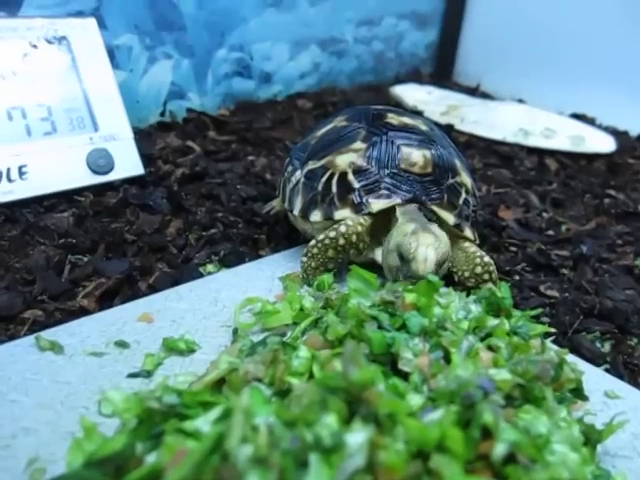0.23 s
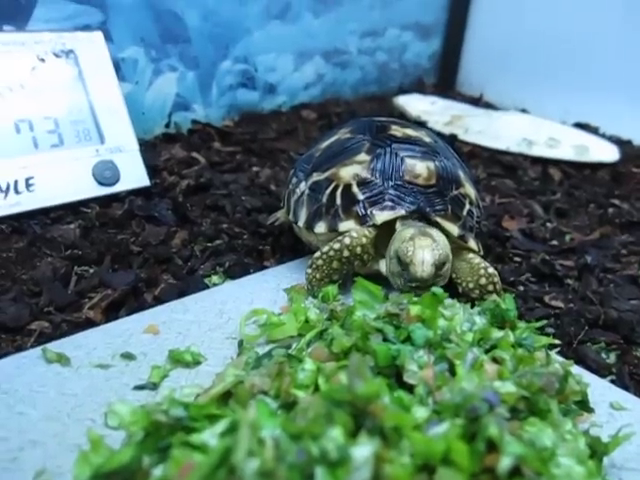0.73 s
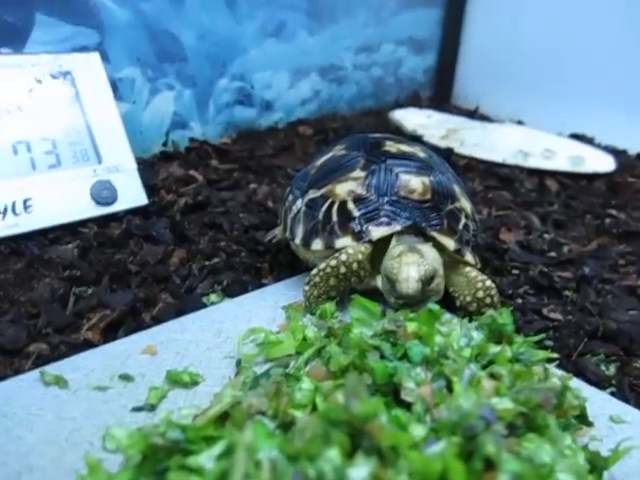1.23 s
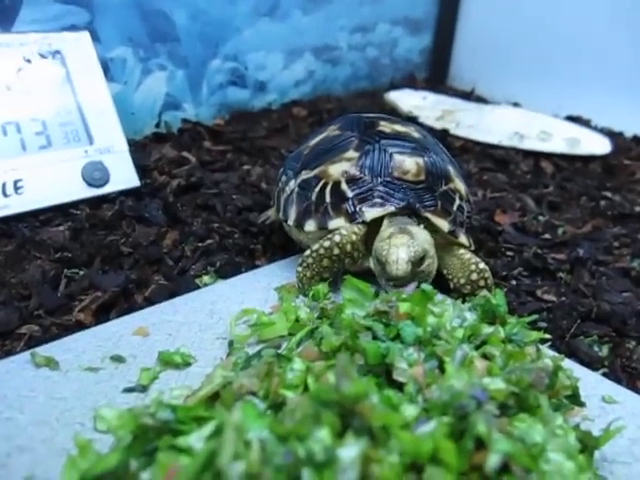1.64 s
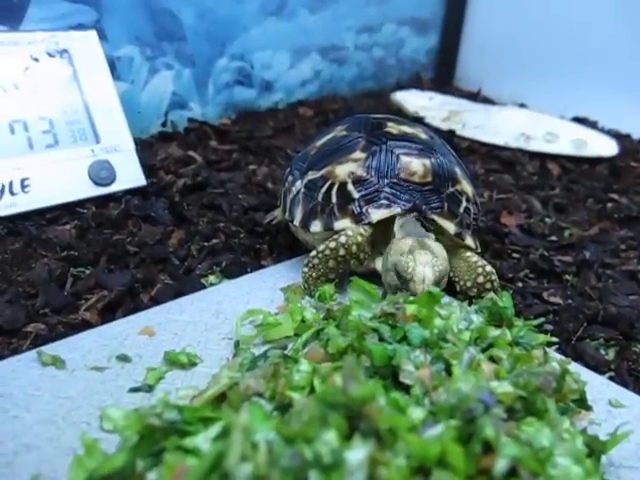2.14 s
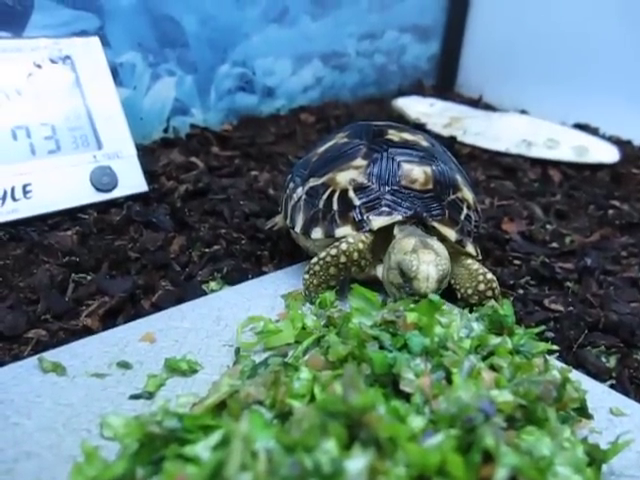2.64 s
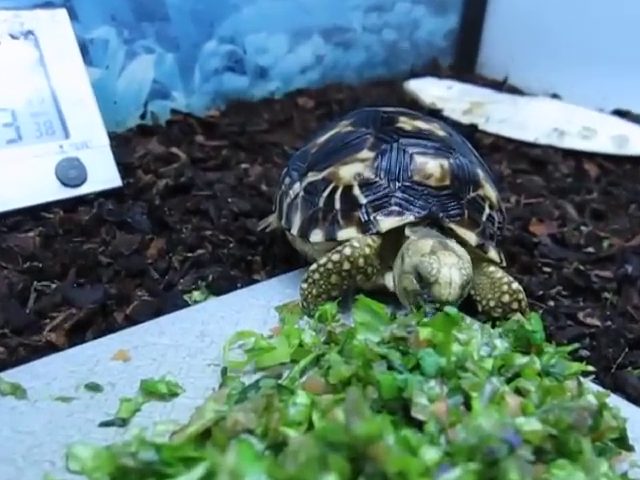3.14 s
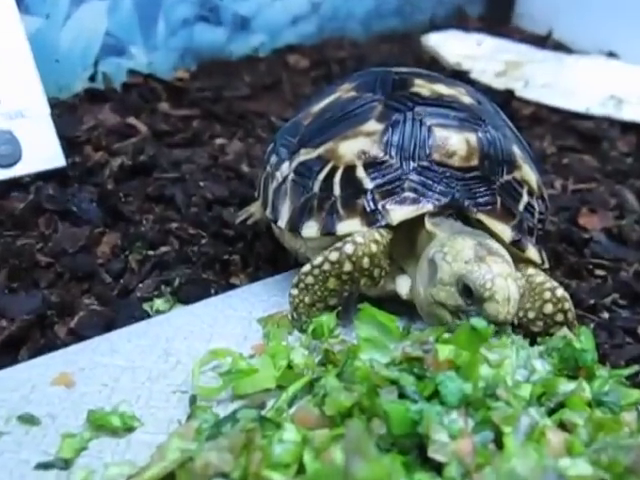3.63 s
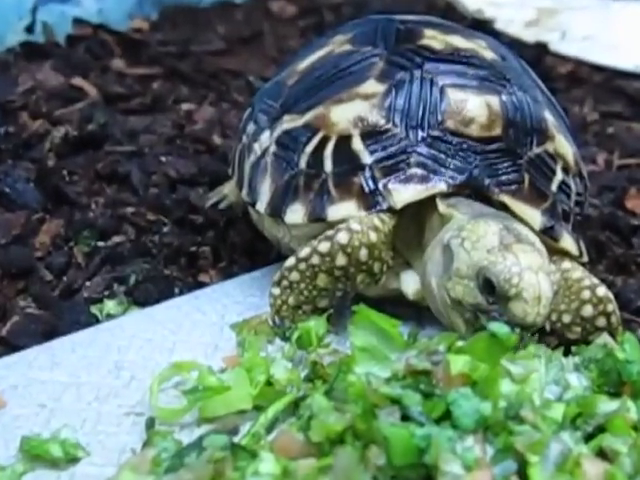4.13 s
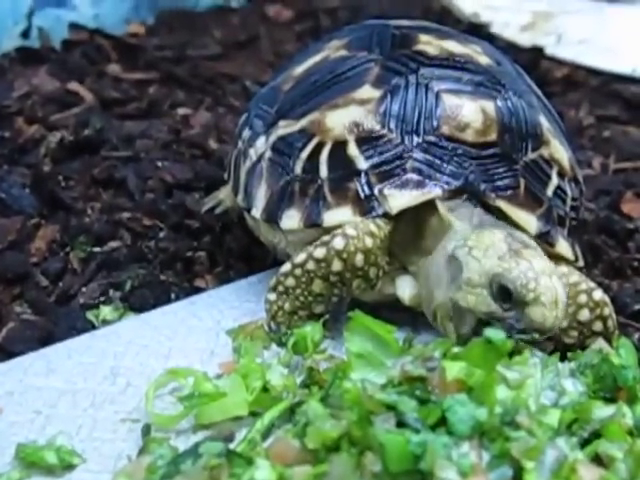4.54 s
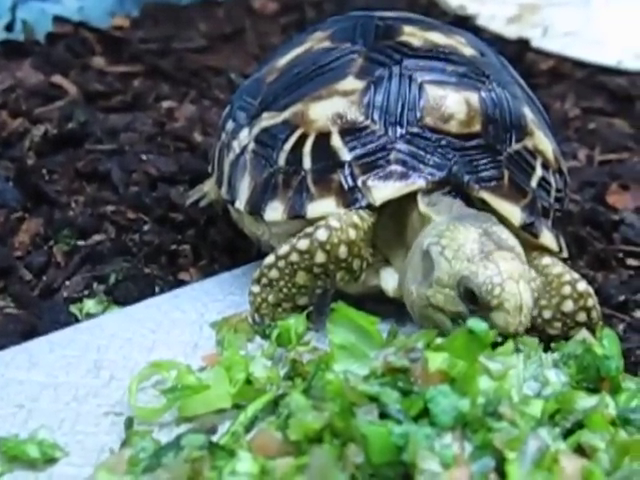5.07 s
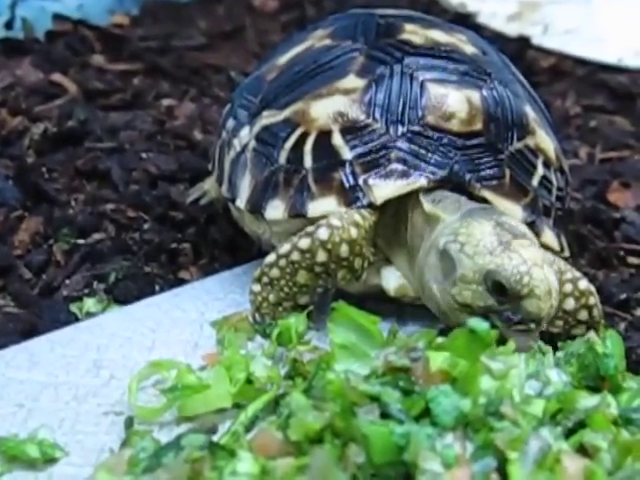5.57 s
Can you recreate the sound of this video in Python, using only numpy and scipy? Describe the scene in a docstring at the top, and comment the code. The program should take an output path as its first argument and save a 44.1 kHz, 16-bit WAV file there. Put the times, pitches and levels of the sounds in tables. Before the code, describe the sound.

Irregular small clicks, leafy rubs and a hard beak knock in a small glass tank, over quiet hiss, hum and a faint far engine.

```python
"""Room air, a low hum and a far engine's drone; then, close by, a tortoise eats greens off a slab in a glass tank.
The engine swells faintly, then harder, and falls back: a gliding firing note with two neighbours.
Snaps, small ticks, jaw knocks and pings of thin metal are impulses through damped modes.
Leaves slide as coloured friction noise in short strokes; room air and hum are filtered noise with sine whine.
The eating sounds scatter off the glass; both channels are the same."""
import sys
import numpy as np
from scipy import signal
from scipy.fft import rfft, irfft, next_fast_len
from scipy.io import wavfile
from scipy.ndimage import map_coordinates

SR = 44100
rng = np.random.default_rng(int(sys.argv[2]) if len(sys.argv) > 2 else 0)


def bounce(signal):
    """Save signal as a 16-bit WAV file at the path given by the first command-line argument."""
    frames = np.transpose(np.atleast_2d(signal))
    limited = np.clip(frames, -1, 1)
    pcm = np.round(limited * 32767).astype(np.int16)
    wavfile.write(sys.argv[1], SR, pcm)


N = 255861


def amp(db):
    """Amplitude ratio of a level in dB."""
    return 10 ** (np.asarray(db) / 20)


def unit(x):
    """Scale to rms 1."""
    return x / np.sqrt(np.mean(x ** 2) + 1e-20)


def along(points, hz):
    """Interpolate (frequency [Hz], value) points on a log frequency axis."""
    point_hz, values = np.transpose(points)
    return np.interp(np.log(hz + 1), np.log(point_hz), values)


def hump(x):
    """A bell of height 1, half as high at x = 1."""
    return 1 / (1 + x * x)


def wobble(knots_per_s):
    """A smooth random curve through normally distributed knots."""
    knots = rng.standard_normal(int(N * knots_per_s / SR) + 4)
    return map_coordinates(knots, [np.arange(N) * knots_per_s / SR])


def filtered(x, response):
    """x through a complex response, given as a function of frequency in Hz."""
    m = next_fast_len(N + SR // 2)
    spectrum = rfft(x, m) * response(np.fft.rfftfreq(m, 1 / SR))
    return irfft(spectrum, m)[:N]


def resonance(f, hz, width_hz):
    """One damped mode, gain 1 at its centre."""
    return 1j * f * width_hz / (hz * hz - f * f + 1j * f * width_hz)


def body(f, modes, order=1):
    """Sum of modes, neighbours in opposite phase; order 2 starts softer and has deeper valleys."""
    total = 0
    for k, (hz, width_hz, db) in enumerate(modes):
        # the root of the order offsets the narrowing caused by the power
        mode = resonance(f, hz, width_hz * np.sqrt(order)) ** order
        total = total + (-1) ** k * amp(db) * mode
    return total


def double(f, gap_ms, second_db):
    """Response of an impulse followed by a second one at its own level."""
    return 1 + amp(second_db) * np.exp(-2j * np.pi * f * gap_ms / 1000)


def fibres(t60_s):
    """Clinging fibres let go over a few milliseconds: response of a dying crackle of energy 1."""
    t = np.arange(SR // 2) / SR
    crackle = rng.standard_normal(len(t)) * amp(-60 * t / t60_s)
    return rfft(crackle / np.linalg.norm(crackle))


def blow_grid():
    """Frequencies of a half-second response."""
    return np.fft.rfftfreq(SR // 2, 1 / SR)


def add(track, time_s, response):
    """Add one impulse through a response to the track, in place."""
    sound = irfft(response)
    part = track[round(time_s * SR):][:len(sound)]
    part += sound[:len(part)]


# air spectrum shape: (frequency [Hz], relative level [dB])
AIR_SHAPE = [(12, -28), (20, -3.5), (90, -4.5), (116, -4.5), (167, -10), (197, -7.5), (355, -7), (419, -9),
             (603, -6), (2800, -14.5), (3040, -16), (6840, -19.5), (8790, -21.5), (14100, -26.5),
             (15800, -31)]
# noise bands: (centre [Hz], width before widening [Hz], level [dB rms])
DRONE_BANDS = [(60, 15, -72), (120.8, 8.8, -68), (169, 19.3, -63.5), (347.5, 20.6, -69.5), (8630, 650, -70)]
# faint electrical whine: (frequency [Hz], level [dB rms])
WHINE_TONES = [(5636, -86), (6535, -85), (7574, -86), (7854, -86), (7881, -84), (8446, -82), (13916, -89)]


def room(air_db_rms=-54.8, widening=1.86):
    """Steady shaped noise, droning narrow noise bands and thin electrical sine tones."""
    t = np.arange(N) / SR
    air_noise = filtered(rng.standard_normal(N), lambda f: amp(along(AIR_SHAPE, f)))
    out = amp(air_db_rms) * unit(air_noise)
    for hz, width_hz, db in DRONE_BANDS:
        band = filtered(rng.standard_normal(N), lambda f: resonance(f, hz, widening * width_hz) ** 2)
        out += amp(db) * unit(band)
    for hz, db in WHINE_TONES:
        out += amp(db) * unit(np.sin(2 * np.pi * hz * t))
    return out


# engine revs: (time of top [s], top firing note [Hz], level [dB],
#   time from top to quarter amplitude [s], rise time from half pitch to top [s])
ENGINE_REVS = [(0.323, 162.9, -60, 0.84, 4.6), (1.399, 162.3, -49, 0.42, 1.55)]
COAST_SLOWER = 1.2  # the pitch falls more slowly than it rose
CYLINDERS = 4


def motor(waver_db=0.5, waver_hz=0.28, below_db=-21, above_db=-17):
    """Each rev rises and falls in pitch and level: a wavering firing note with two weaker neighbours."""
    out, t = np.zeros(N), np.arange(N) / SR
    for top_s, top_hz, db, swell_s, pitch_s in ENGINE_REVS:
        glide_s = np.where(t < top_s, pitch_s, pitch_s * COAST_SLOWER)
        firing_hz = top_hz * hump((t - top_s) / glide_s) + waver_hz * wobble(11.7)
        cycle = 2 * np.pi * np.cumsum(firing_hz) / SR / CYLINDERS
        note = np.sin(CYLINDERS * cycle)
        note += amp(below_db) * np.sin((CYLINDERS - 1) * cycle)
        note += amp(above_db) * np.sin((CYLINDERS + 0.99) * cycle)
        swell = hump((t - top_s) / swell_s) ** 2
        out += amp(db + waver_db * wobble(10.3)) * swell * unit(note)
    return out


# touches of thin metal: (time [s], level [dB], overtone level [dB])
PING_TOUCHES = [(0.4507, 19.5, -16.5), (0.8223, 8, -1), (.869, 4, -2), (4.187, 8.5, 1)]
# thin metal modes: (frequency [Hz], width [Hz])
METAL_MODES = [(2537, 7), (3055, 7.5), (3395, 14), (3757, 15), (4480, 60)]
# balance of the modes above the lowest: level on top of the overtone level [dB]
OVERTONE_BALANCE_DB = [0.5, -4.5, -1.5, -14]


def pings():
    """The same metal modes ring each time; the spot touched sets the overtone strength."""
    out, f = np.zeros(N), blow_grid()
    for time_s, db, overtones_db in PING_TOUCHES:
        mode_db = [0] + [overtones_db + level for level in OVERTONE_BALANCE_DB]
        modes = [(hz, width_hz, level) for (hz, width_hz), level in zip(METAL_MODES, mode_db)]
        add(out, time_s, amp(db) * body(f, modes))
    return out


# leaves sliding under the beak: (time [s], length [s], level [dB], pitch factor)
LEAF_SLIDES = [(0.862, .11, -50.5, 1.15), (0.93, 0.14, -59.5, 1.05), (1.208, 0.092, -51, 1.03),
               (1.288, 0.1, -52.5, 1.0), (1.43, 0.043, -56.5, 1.02), (1.573, 0.028, -57, 1.02),
               (2.387, 0.083, -58.5, 0.97), (2.7, 0.16, -59, 1.11)]
# broad colour of the slides at pitch factor 1: (frequency [Hz], width [Hz], level [dB])
SLIDE_COLOUR = [(920, 250, -2), (1914, 370, 3.5), (2630, 270, 2.5), (3700, 1300, -12), (5300, 1150, -5.5),
                (6300, 690, -8), (7300, 690, -4.5), (11000, 3000, -22)]
EVEN_SLIDE_DB, DULLING_DB_PER_OCT_PER_DB = -53, 0.14  # louder strokes than the first tilt down
CATCHES_PER_S, CATCHES_DB = 400, -8.5  # leaf edges catching; level beside the rubbing


def leaves(grain_db=2.0):
    """Leaf rubs and catches on leaf in strokes; a tauter leaf sounds higher, a harder stroke duller."""
    out, t = np.zeros(N), np.arange(N) / SR
    catches = (rng.random(N) < CATCHES_PER_S / SR) * rng.uniform(-1.1, 1, N)
    rubbing = rng.standard_normal(N) * amp(grain_db * wobble(1000))
    friction = unit(rubbing) + amp(CATCHES_DB) * unit(catches)
    for time_s, length_s, db, pitch in LEAF_SLIDES:
        progress = np.clip((t - time_s) / length_s, 0, 1)
        stroke = np.abs(np.sin(np.pi * progress)) ** 0.65
        tilt_db_per_oct = DULLING_DB_PER_OCT_PER_DB * (EVEN_SLIDE_DB - db)
        colour = lambda f: body(f / pitch, SLIDE_COLOUR, order=2) * amp(tilt_db_per_oct * np.log2(f + 1))
        out += amp(db) * stroke * unit(filtered(friction, colour))
    return out


# small ticks: beak contacts, leaf tears and touches on the metal:
#   (time [s], level [dB], pitch [Hz], crispness [dB])
SMALL_TICKS = [(.1473, -2, 2740, -30), (0.236, -15, 2420, -20), (0.247, -15, 7700, -10),
               (.418, -15, 2210, -19), (0.425, -13, 2230, -19), (0.439, -23.5, 9000, 6),
               (.451, -14, 2400, -18), (.864, -20.5, 6700, -9), (.8671, -6.5, 2320, -22),
               (0.882, -7, 935, -28), (0.9367, -3.5, 900, -13), (.9355, -0.5, 2230, -14),
               (1.2377, -8, 1650, -19), (1.8819, -1, 2950, -24), (2.4127, -18.5, 4050, -14),
               (2.427, -16, 2780, -20), (2.551, -11, 2430, -16.5), (4.55, -7, 2210, -30),
               (4.663, -6, 910, -25)]
TICK_Q, TICK_MAX_WIDTH_HZ = 3.6, 980
REPEAT_MS, REPEAT_LOG_SPREAD, REPEAT_DB = 2.2, 0.15, -4


def ticks(crisp_hz=5500, crisp_width_hz=4000, cling_t60_s=0.056, cling_db=-7):
    """Each tick has a weaker repeat about 2 ms later, likely an echo off a wall, and a dying crackle."""
    out, f = np.zeros(N), blow_grid()
    crisp = resonance(f, crisp_hz, crisp_width_hz)
    for time_s, db, hz, crisp_db in SMALL_TICKS:
        width_hz = min(hz / TICK_Q, TICK_MAX_WIDTH_HZ)
        gap_ms = REPEAT_MS * np.exp(REPEAT_LOG_SPREAD * rng.standard_normal())
        contact = double(f, gap_ms, REPEAT_DB) + amp(cling_db) * fibres(cling_t60_s)
        tone = body(f, [(hz, width_hz, 0)], order=2) + amp(crisp_db) * crisp
        add(out, time_s, amp(db) * contact * tone)
    return out


# beak knocking through food: (time [s], level [dB], pitch [Hz], width [Hz],
#   ring level [dB], hard edge level [dB], slab thump level [dB])
BEAK_KNOCKS = [(0.2468, -1, 686, 78, 12.5, -12, -13), (0.4349, -9, 643, 95, 24, 1, -29),
               (5.3568, 3.5, 1920, 137, 9, -1.5, 2.5)]
# broad colour of the jaw knocks: (frequency [Hz], width [Hz], level [dB])
JAW_MODES = [(283, 68, 3), (382, 160, 0.5), (894, 360, 4), (1256, 170, 0), (1520, 420, -2),
             (2630, 370, 3.5), (6740, 830, -23)]
# broad colour of the bright edge: (frequency [Hz], width [Hz], level [dB])
EDGE_MODES = [(3580, 160, -7), (3790, 130, -7.5), (4700, 720, -11.5), (6500, 420, -17), (10500, 4300, -43)]
# slab resonances: (frequency [Hz], width [Hz], level [dB])
SLAB_MODES = [(91, 15, 0), (143.3, 9.7, 11), (223, 16, 6), (272, 9.5, 9), (368, 38, -10.5), (534, 50, -1),
              (654, 16, -1), (834, 78, -4), (1090, 76, 0.5), (2690, 240, 0)]


def knocks(slab_lag_s=0.007, lag_at_hz=200):
    """The jaw shuts with a hollow, ringing knock, a bright edge and a slab thump, each at its own level."""
    out, f = np.zeros(N), blow_grid()
    # bending waves are slower at low pitch, so the thump slides downwards
    dispersion = np.exp(-4j * np.pi * slab_lag_s * np.sqrt(f * lag_at_hz))
    slab = body(f, SLAB_MODES) * dispersion
    jaw = body(f, JAW_MODES, order=2)
    edge = body(f, EDGE_MODES, order=2)
    for time_s, db, hz, width_hz, ring_db, edge_db, thump_db in BEAK_KNOCKS:
        ring = amp(ring_db) * resonance(f, hz, width_hz)
        knock = amp(edge_db) * edge - jaw - ring + amp(thump_db) * slab
        add(out, time_s, amp(db) * knock)
    return out


# crisp stalks breaking: (time [s], level [dB], ring [Hz], ring width [Hz], ring level [dB],
#   second crack delay [ms], second crack level [dB], stem level [dB])
STALK_SNAPS = [(1.7714, -6, 6710, 144, 19, 0.44, -5, -7), (2.5157, 3, 8790, 147, 11, 0.772, -9.5, 3.5)]
# broad colour of the snaps, partly from the microphone's port: (frequency [Hz], width [Hz], level [dB])
SNAP_COLOUR = [(1290, 2200, -13), (2720, 370, 4.5), (5400, 340, -12), (6170, 1100, 0), (7520, 300, 6.5),
               (10800, 760, -15), (12100, 760, 0.5), (13770, 460, 2.5), (14000, 550, -7), (15300, 500, -4)]
# stem resonances: (frequency [Hz], width [Hz], level [dB])
STEM_MODES = [(1950, 130, -2), (3346, 45, 4), (4021, 55, 2)]


def snaps():
    """A stalk gives way in two cracks; the break and the stem ring briefly."""
    out, f = np.zeros(N), blow_grid()
    colour, stem = body(f, SNAP_COLOUR, order=2), body(f, STEM_MODES)
    for time_s, db, hz, width_hz, ring_db, gap_ms, second_db, stem_db in STALK_SNAPS:
        ring = amp(ring_db) * resonance(f, hz, width_hz) + amp(stem_db) * stem
        cracks = double(f, gap_ms, second_db)
        add(out, time_s, amp(db) * cracks * (colour + ring))
    return out


def tank(x, t60_s=0.023, wet_db=-18):
    """The glass walls return a short, weak scatter: decaying noise from 2 ms on."""
    t = np.arange(SR // 4) / SR
    tail = rng.standard_normal(len(t)) * amp(-60 * t / t60_s) * (t > 0.002)
    scatter = signal.fftconvolve(x, tail / np.linalg.norm(tail))[:N]
    return x + amp(wet_db) * scatter


def scene():
    """Eating scatters off the tank; pings, engine and room stay dry; one mono mix feeds both channels."""
    eating = tank(snaps() + ticks() + knocks() + leaves())
    mono = eating + pings() + motor() + room()
    return np.array([mono, mono])


def record(dry, top_hz=15900):
    """A sharp band limit removes everything from top_hz up."""
    return np.array([filtered(channel, lambda f: f < top_hz) for channel in dry])


dry = scene()
out = record(dry)
bounce(out)
```